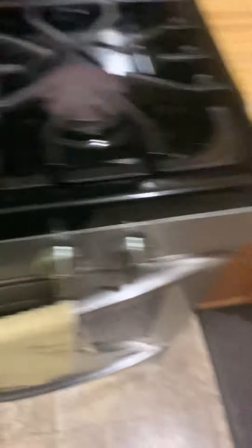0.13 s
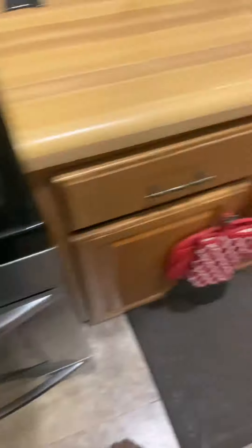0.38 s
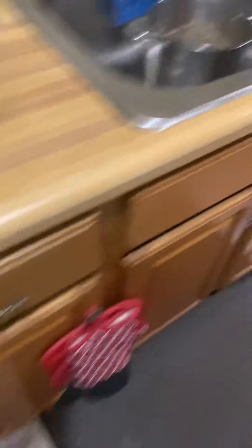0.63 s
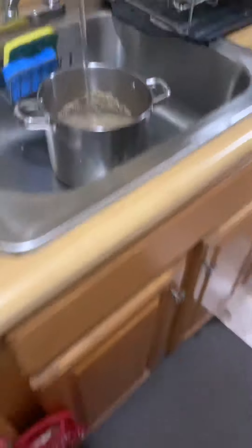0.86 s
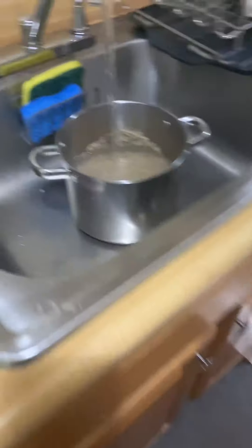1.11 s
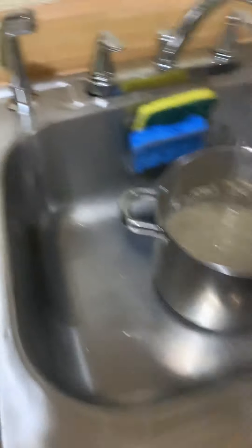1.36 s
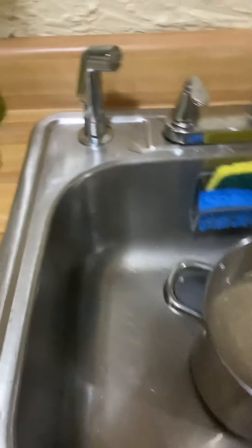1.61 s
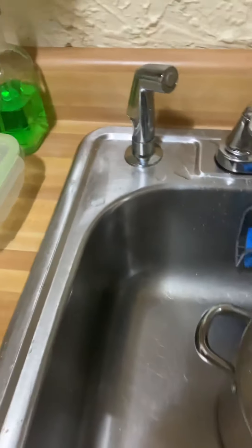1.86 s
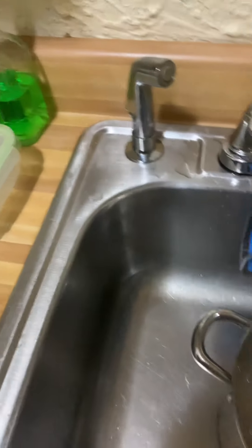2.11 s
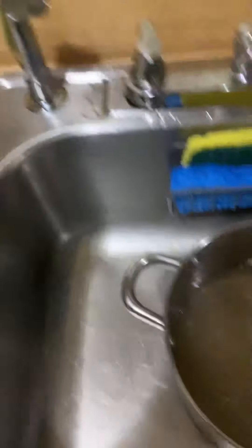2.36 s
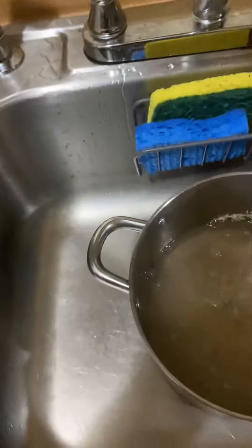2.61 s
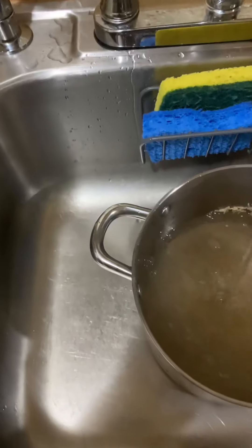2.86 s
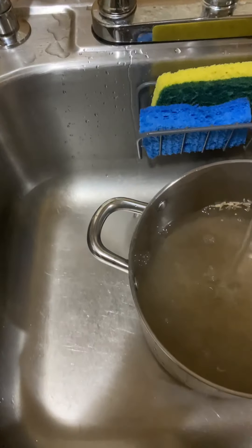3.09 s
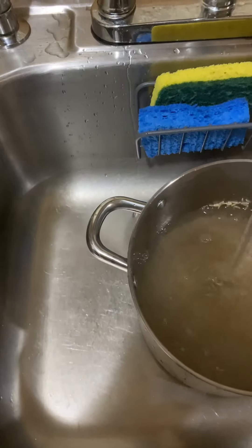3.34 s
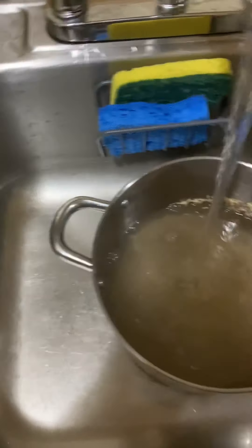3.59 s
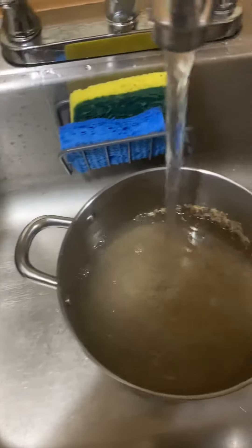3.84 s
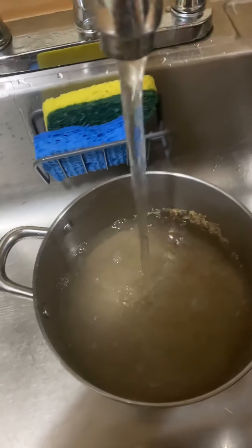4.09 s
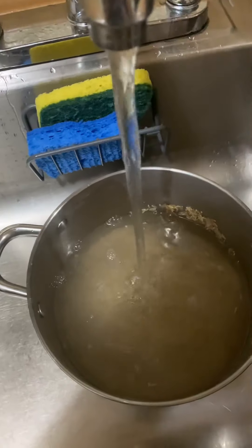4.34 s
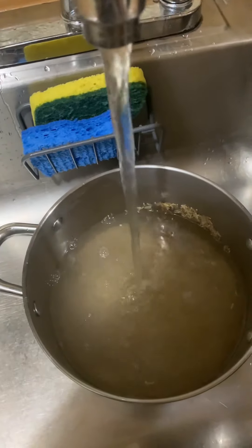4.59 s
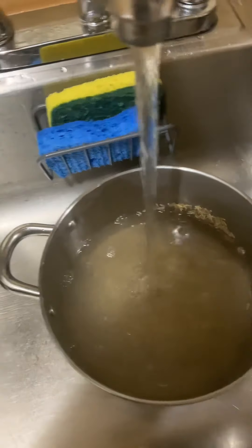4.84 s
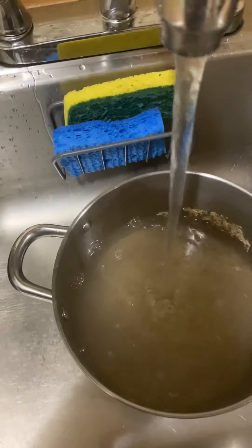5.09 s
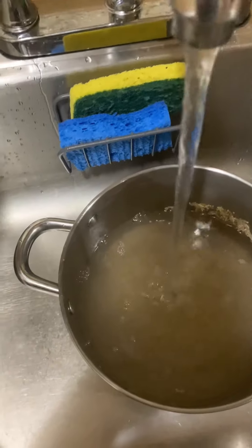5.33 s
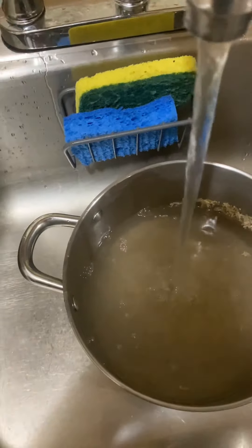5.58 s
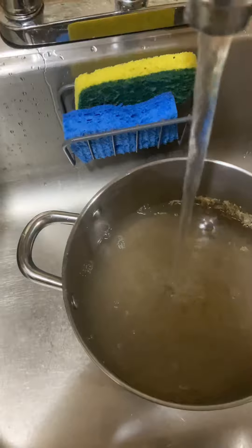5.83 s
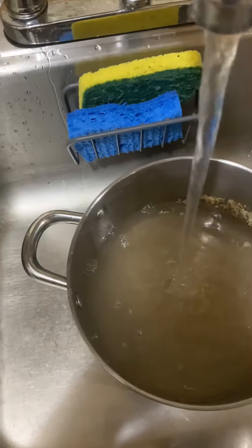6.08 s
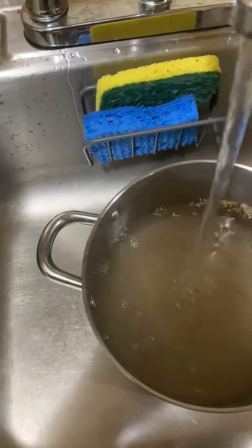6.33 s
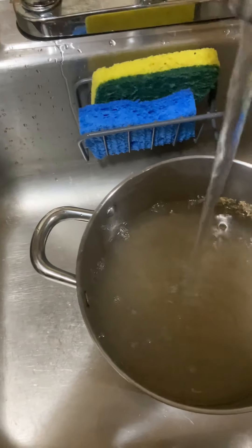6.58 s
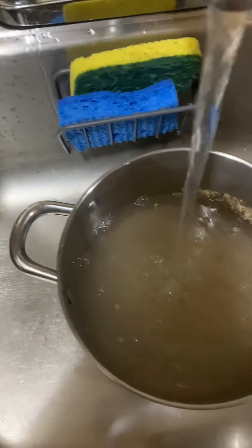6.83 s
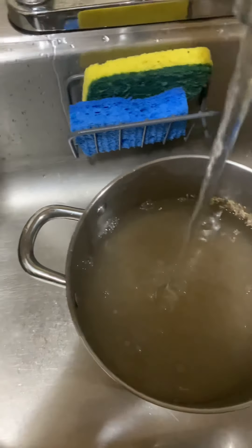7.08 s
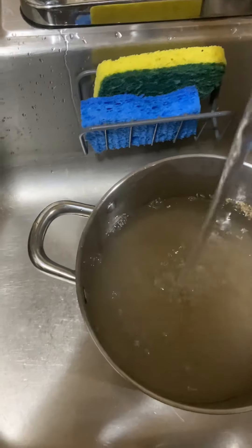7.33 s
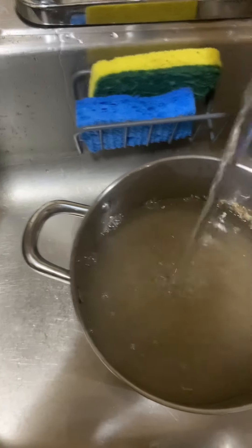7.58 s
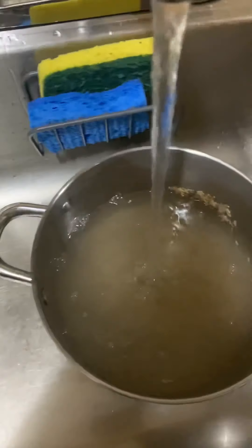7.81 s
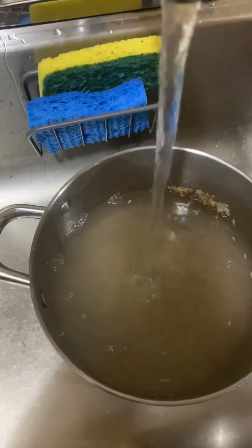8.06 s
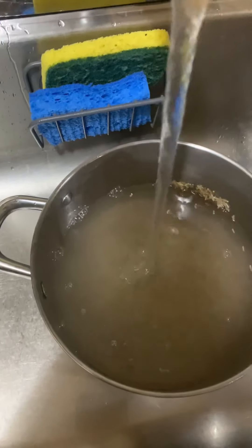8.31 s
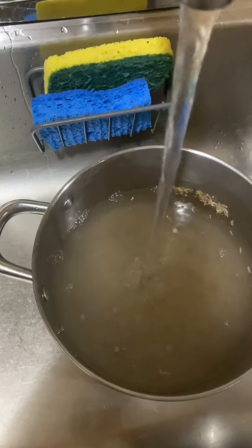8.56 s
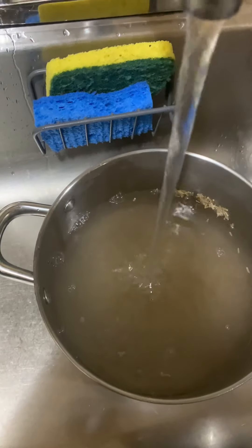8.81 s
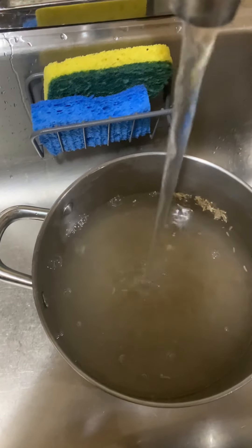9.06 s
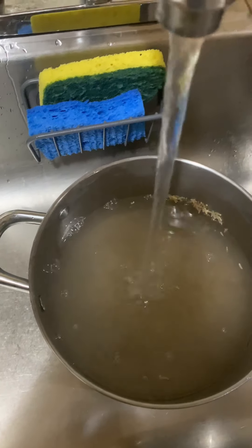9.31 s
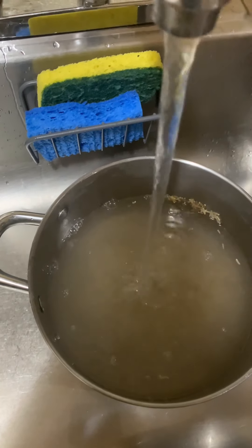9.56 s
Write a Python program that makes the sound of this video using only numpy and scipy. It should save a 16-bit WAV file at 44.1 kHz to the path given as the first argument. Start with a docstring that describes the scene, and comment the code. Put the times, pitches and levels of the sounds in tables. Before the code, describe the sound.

A handheld stereo microphone crosses a small indoor kitchen toward a running tap. At 0 s the water is a faint, distant hiss over a quiet low appliance drone. Around 0.4-0.55 s a floorboard gives a short, rough creak; a dull low footstep follows at 0.6 s with a weaker thud just after, and another soft step at 1.3 s. A drop ticks on steel near 0.9 and 1.4 s. The hiss swells steadily until about 4 s, bright and slightly metallic from the pot and sink. Hollow gulps thicken from 2.3 s, with a strong one near 4 s and others around 5.2-6 s. From 4 to 9.7 s the stream stays close and steady, full of small rising bubble pops, wavering gurgles and a brief bubbly flurry near 6.3 s. Sharp drop ticks come at 3.7, 4.5, 6.8 and 7.4 s, then cluster around 8.4-8.7 s. The water is still running at the end.

```python
"""Water hisses faintly into a steel pot in a steel sink, growing louder as a handheld phone nears it.
Early on a floorboard creaks by stick and slip, and footsteps thud as short, low sums of partials.
The jet is noise filtered by the rings of the steel; bubbles are short sines of rising pitch.
Large bubbles and churning noise sound the air in the pot, small bubbles pop, drops tick on the steel.
Beneath lies the kitchen's low drone, made of filtered noise and wavering tones."""
import sys
import numpy as np
from scipy import signal
from scipy.fft import rfft, irfft
from scipy.io import wavfile
from scipy.ndimage import uniform_filter1d

SR = 44100
rng = np.random.default_rng(int(sys.argv[2]) if len(sys.argv) > 2 else 0)


def int16_out(signal):
    """Quantize to a 16-bit WAV file."""
    q = np.round(np.clip(np.atleast_2d(signal).T, -1, 1) * 32767)
    wavfile.write(sys.argv[1], SR, q.astype(np.int16))


def voltage_ratio(level):
    """Linear amplitude factor for a level in decibels (scalar or array-like)."""
    return 10 ** (np.asarray(level, float) / 20)


N = 426888  # length in samples

# The water as the phone comes near. Each row: time in seconds, jet level in dB,
# level of the gurgle in the pot's hollow in dB.
WATER_LEVELS = [(0.0, -40.5, -49.5), (0.35, -39, -58), (0.7, -35.5, -52.5), (1.2, -33, -52),
                (2.0, -30, -47.5), (2.27, -30.5, -50), (2.34, -31, -43), (2.75, -29, -49), (3.2, -31, -42),
                (3.33, -30, -48.5), (3.9, -28, -47), (4.4, -27, -43), (4.95, -28, -46.5),
                (5.45, -27.5, -45), (5.65, -27.5, -48), (6.9, -28.5, -44), (7.27, -29.5, -48.5),
                (7.9, -28, -48.5), (8.6, -27.5, -45.5), (9.2, -29, -46.5), (9.68, -28.5, -49)]
# Broad colour of the jet between the rings. Each row: frequency in Hz, relative level in dB.
JET_COLOUR = [(300, -30), (1000, -26), (2000, -27), (2850, -27), (3190, -31), (3360, -23), (4100, -13),
              (4480, -21), (4900, -9), (5400, -16), (6500, -16), (7800, -12), (8500, -9), (9400, -9),
              (10300, -17), (11000, -17), (13000, -19), (15500, -18)]
# Rings of pot and sink. Each row: frequency in Hz, width in Hz, relative level in dB.
STEEL_MODES = [(2280, 60, -15.0), (3025, 48, -15.0), (3765, 63, -7.0), (3947, 96, -9.0), (4280, 70, -5.0),
               (4622, 41, -4.0), (4793, 89, -4.0), (4986, 44, -4.0), (5199, 76, -5.0), (5606, 61, -12.0),
               (6046, 42, -11.0), (7241, 70, -9.0), (7563, 45, -3.5), (8128, 65, -3.5), (8618, 37, -4.0),
               (8730, 45, -3.0), (9025, 68, -3.0), (9212, 57, 2.0), (9321, 38, 0.0), (9439, 35, -3.0),
               (9550, 60, 0.0), (9805, 60, -1.0), (10140, 100, -5.5), (10448, 63, -10.0), (10680, 70, -8.5),
               (11323, 110, -14.0), (11638, 36, -15.0), (11919, 44, -14.0), (12296, 39, -13.0),
               (12769, 55, -14.0)]
# Resonances of the air in the pot. Each row: frequency in Hz, width in Hz, relative level in dB.
AIR_MODES = [(594, 21, 1), (668, 40, -2.5), (790, 90, -17), (1250, 70, -6), (1530, 40, -11)]
# Loudest large bubbles pulled under by the jet. Each row: start in seconds, peak in dB, pitch in Hz.
LARGE_BUBBLES = [(1.365, -34.5, 640), (2.32, -42, 590), (2.46, -36, 590), (2.6, -36.5, 600),
                 (3.075, -36, 620), (3.13, -33.5, 580), (2.832, -31, 556), (2.887, -31, 660),
                 (3.692, -29, 625), (3.762, -34, 590), (3.924, -33, 575), (3.984, -22, 655),
                 (4.217, -31, 570), (4.261, -31.5, 595), (5.041, -28.5, 587), (5.193, -24.5, 570),
                 (5.32, -37, 596), (5.36, -32, 600), (5.491, -26, 563), (5.631, -34.5, 665),
                 (5.962, -32, 630), (6.043, -26, 587), (6.689, -27, 630), (6.849, -37, 584),
                 (6.906, -30, 680), (7.731, -27.5, 620), (8.251, -34, 603), (8.573, -33, 670)]
# Loudest small bubbles. Each row: start in seconds, peak in dB before the steel answers, pitch in Hz.
SMALL_BUBBLES = [(1.6881, -29, 3930), (2.0964, -34.5, 2200), (2.1281, -23, 3930), (2.3243, -37.5, 2230),
                 (2.8696, -28, 2940), (2.9634, -40, 1380), (3.0611, -41, 2330), (3.5845, -43, 1820),
                 (3.9187, -33, 2330), (3.9811, -31, 1790), (4.4749, -37, 2270), (4.6361, -34, 2220),
                 (4.9598, -40, 1550), (5.1454, -37, 1410), (5.2337, -36.5, 1400), (5.6473, -36.5, 1420),
                 (5.9865, -35, 1400), (7.5684, -35, 1610), (7.6921, -35, 2480), (7.7221, -29.5, 2420),
                 (7.76, -35, 1340), (8.1101, -36, 3020), (2.1796, -38, 2230), (2.61, -37, 2270),
                 (2.7, -32, 2960), (2.935, -31, 3000), (4.99, -34, 2300), (5.4, -40, 1450),
                 (8.19, -32, 2800), (8.295, -41, 2320), (8.49, -35, 2400), (8.555, -33, 2510),
                 (8.69, -32, 2500), (8.75, -35.5, 1350), (9.095, -36, 2600), (8.5526, -37, 1350),
                 (8.5835, -48, 1520), (8.6654, -38, 1520), (8.7242, -28.5, 3040), (8.85, -50, 1160),
                 (8.9238, -42, 1530), (9.006, -33.5, 2400), (9.072, -37, 1560), (9.193, -41, 1160),
                 (9.2376, -38, 1330), (9.284, -34, 2270), (9.5673, -43, 1600), (3.9554, -36, 1350),
                 (4.13, -33, 2280), (4.2238, -23, 3780), (4.3975, -27, 3020), (4.809, -31.5, 1305),
                 (5.0315, -18, 3840), (5.1047, -24, 3870), (5.393, -24, 3800), (5.531, -23, 3770),
                 (5.692, -28, 2280), (6.031, -36.5, 1120), (6.241, -29, 3000), (7.7218, -30, 3700),
                 (7.8371, -30, 2630), (7.9564, -26, 3960), (8.148, -33.5, 2270), (8.1838, -36.5, 1350),
                 (8.3858, -29.5, 2400), (8.518, -39, 1300), (8.629, -25, 3730), (8.691, -22, 3920),
                 (9.2606, -29.5, 2550), (9.478, -23.5, 3010)]
# Drops on bare steel. Each row: start in seconds, peak in dB, pitch in Hz.
DROP_TICKS = [(0.9009, -19.5, 5200), (1.4242, -21.5, 5900), (3.6895, -14.5, 6750), (4.4544, -21, 7000),
              (6.78, -21, 6500), (7.3706, -17.5, 7100), (8.429, -20, 6460), (8.656, -22, 6890),
              (8.6967, -17, 7240), (8.737, -17, 7400)]
# Quick swarms of bubbles. Each row: start in seconds, length in seconds, level in dB, middle pitch in Hz.
BUBBLE_SWARMS = [(1.633, 0.11, -42, 2070), (6.252, 0.32, -46.5, 1710)]
# Slipping of the floorboard. Each row: time in seconds, relative level in dB, mean slips per second.
BOARD_SLIPS = [(.379, -32.5, 67), (.44, -32, 64), (0.499, -35, 77), (0.549, -33, 98)]
# Resonances of the floorboard. Each row: frequency in Hz, width in Hz, relative level in dB.
BOARD_MODES = [(110, 70, -2), (240, 90, -6), (416, 17, 7), (650, 250, -15), (950, 250, -22),
               (1250, 90, -13), (1510, 60, -20)]
# Footsteps. Each row: start in seconds, starting level in dB, lowest partial in Hz,
# length in seconds, change of level by the end in dB.
FOOTSTEPS = [(0.626, -28.5, 46, 0.11, -7), (0.734, -39, 50.3, 0.043, -3), (1.321, -34, 46.3, 0.085, -7)]
# Spectrum of the low air noise. Each row: frequency in Hz, relative density in dB per Hz.
DRONE_COLOUR = [(28, -33), (50, -9), (65, -3.5), (102, -4), (150, -0.5), (179, -8.5), (237, 0), (300, 0),
                (445, -10.5), (520, -11), (680, -24), (1140, -120)]
# Appliance tones. Each row: mean frequency in Hz, mean amplitude in dB.
APPLIANCE_TONES = [(43.1, -51), (118.4, -70), (236.9, -57)]
# Relation of the left and right channels; phase_steps() reshapes lead and likeness in the treble.
# Each row: frequency in Hz, lead of the left in half turns, likeness from 0 to 1, left minus right in dB.
CHANNEL_PAIR = [(30, 0, 1, 0), (200, -.05, .97, -1.8), (340, -.1, .9, -1.2), (620, -.36, .62, -6.5),
                (1000, -.1, .6, -5), (1400, 0, .85, 0), (2000, .06, .8, 0), (2500, .3, .5, -1),
                (3400, .5, .5, 0), (3800, .6, .9, 0), (4690, 1, .99, 0), (6650, 2, .99, 0),
                (16380, 6.5, .99, 0)]


def evened(x):
    """Normalization: scales a signal to rms 1."""
    return x / np.sqrt(np.mean(x ** 2) + 1e-20)


def add(mix, start_s, sound):
    """Superposition: adds a sound to the mix at start_s seconds."""
    part = mix[round(start_s * SR):][:len(sound)]
    part += sound[:len(part)]


def slow(count, frames, size):
    """Low-passed chance: rows of noise averaged twice over size frames, rms 1."""
    noise = rng.standard_normal((frames, count))
    once = uniform_filter1d(noise, size, 0)
    return evened(uniform_filter1d(once, size, 0)).T


def control(column):
    """Linear interpolation: one column of the water table, sample by sample."""
    return np.interp(np.arange(N) / SR, *np.transpose(WATER_LEVELS)[[0, column]])


def ring(x, modes):
    """Modal resonance: a sum of damped two-pole modes of alternating sign, driven by x."""
    out = 0
    for k, (hz, width, db) in enumerate(modes):
        r = np.exp(-np.pi * width / SR)
        pole = [1, -2 * r * np.cos(2 * np.pi * hz / SR), r * r]
        mode = signal.lfilter([1 - r, 0, r - 1], pole, x)
        out = out + (-1) ** k * voltage_ratio(db) * mode
    return out


def blip(hz, cycles, glide):
    """Bubble oscillation: a swelling and dying sine whose pitch rises as it nears the surface."""
    u = np.arange(round(3 * cycles * SR / hz)) * hz / SR / cycles
    shape = u ** 0.7 * np.exp(-2.2 * u)
    turns = cycles * (u + glide * u ** 2 / 2)
    return np.sin(2 * np.pi * turns) * shape / shape.max()


def sparse(per_s, spread_db):
    """Random impulses of either sign at chance moments: mostly small, a few large."""
    size = voltage_ratio(spread_db * np.minimum(rng.exponential(1, N), 3))
    return size * (rng.random(N) < per_s / SR) * rng.choice([-1., 1.], N)


def crowd(lo_hz, hi_hz, per_s, cycles, count):
    """Shot noise: bubbles of count pitches at random moments, some pitches gliding far; rms 1."""
    total = 0
    for hz in np.geomspace(lo_hz, hi_hz, count):
        moments = sparse(per_s / count, spread_db=2.0)
        bubble = blip(hz, cycles, 0.308 * rng.random() ** 2)
        total = total + signal.oaconvolve(moments, bubble)[:N]
    return evened(total)


def splash_db(t):
    """Distance balance: lift of splash over hiss at times t, greater from afar, with a drawn wander."""
    close_db, lift_close_db, lift_per_db, wander_db = -29, 0.37, 0.35, 1.23
    far_db = close_db - np.interp(t, *np.transpose(WATER_LEVELS)[[0, 1]])
    waves = (np.sin(2 * np.pi * (f * t + rng.random())) for f in np.geomspace(.3, 1.5, 8))
    return lift_close_db + lift_per_db * far_db + wander_db * evened(sum(waves))


def with_echo(x, t60=.06, count=5):
    """Reverberation: the direct sound and a smeared copy, from random tails crossfaded in turn."""
    t = np.arange(4096) / SR
    tails = rng.standard_normal((count, 4096)) * voltage_ratio(-60 * t / t60)
    tails = tails / np.linalg.norm(tails, axis=1, keepdims=True)
    place = (np.arange(N) / SR * 3 - np.arange(count)[:, None]) % count - 1  # three tails a second
    turns = np.cos(np.pi / 2 * np.clip(place, -1, 1))  # neighbours overlap, squares sum to 1
    copies = signal.oaconvolve(x * turns, tails, axes=1)
    return np.array([x, copies.sum(0)[:N]])


def jet():
    """Filtered turbulence: hiss coloured by steel rings that swell and fade as the phone shifts."""
    drive = rng.standard_normal((2, N)) * voltage_ratio(0.34 * slow(count=1, frames=N, size=500))
    hz, t, z = signal.stft(drive, SR, nperseg=1024, noverlap=768)
    colour_hz, colour_db = np.transpose(JET_COLOUR)
    power = voltage_ratio(2 * np.interp(np.log(hz + 1), np.log(colour_hz), colour_db))[:, None]
    # echoes off the sink walls ripple the colour, and the ripple shifts as the phone moves
    ripple = evened(uniform_filter1d(slow(count=513, frames=len(t), size=150), 3, 0))
    power = power * voltage_ratio(2 * 3.2 * ripple)
    drift_db = 2.7 * slow(count=len(STEEL_MODES), frames=len(t), size=60)
    for (ring_hz, width, db), drift in zip(STEEL_MODES, drift_db):
        detuning = 2 * (hz[:, None] - ring_hz) / width
        power = power + voltage_ratio(2 * (db + drift)) / (1 + detuning ** 2) ** 1.5
    patches = evened(uniform_filter1d(slow(count=513, frames=len(t), size=4), 14, 0))
    low = 1 / (1 + (hz[:, None] / 5600) ** 8)  # the splash rules the lower hump
    z *= np.sqrt(power) * voltage_ratio(1.1 * patches + low * splash_db(t))
    hiss = signal.istft(z, SR, nperseg=1024, noverlap=768)[1][:, :N]
    return voltage_ratio(control(column=1)) * evened(hiss)


def hollow():
    """Cavity resonance: large bubbles and the churn of the jet sound the air in the pot."""
    churn = rng.standard_normal(N) * voltage_ratio(4.6 * slow(count=1, frames=N, size=2000)[0])
    large = crowd(562, 830, 110, 5.94, count=8)
    gurgle = evened(ring(churn, AIR_MODES)) + 0.67 * large + 0.84 * evened(ring(large, AIR_MODES))
    out = voltage_ratio(control(column=2)) * evened(gurgle)
    for s, db, hz in LARGE_BUBBLES:
        gulp = np.append(blip(hz, 2.04, 0.035), np.zeros(6000))
        add(gulp, 0, 0.88 * blip(hz / 2, 0.49, 0.05))  # the slap of the water closing over
        gulp = gulp + 17 * ring(gulp, AIR_MODES[:1]) + 5 * ring(gulp, AIR_MODES[1:3])
        add(out, s, voltage_ratio(db) * gulp / abs(gulp).max())
    return with_echo(out, .05)


def bubbles():
    """Bubble acoustics: single pops, swarms and ticks over a crowd, with the steel ringing in answer."""
    level_db = control(column=1) + splash_db(np.arange(N) / SR) - 22.5
    pops = crowd(1107, 3097, 350, 8.8, count=24)
    plops = crowd(1020, 3150, 150, 1.74, count=8)  # briefer than the pops
    out = voltage_ratio(level_db) * (pops + 0.35 * plops)
    out *= voltage_ratio(2.26 * slow(count=1, frames=N, size=1100)[0])  # bubbles come in clumps
    for s, length, db, hz in BUBBLE_SWARMS:
        swarm = crowd(0.82 * hz, 1.37 * hz, 900, 7.6, count=6)[:round(length * SR)]
        add(out, s, voltage_ratio(db) * swarm * np.hanning(len(swarm)))
    for s, db, hz in SMALL_BUBBLES:
        add(out, s, voltage_ratio(db) * blip(hz, 9.9, 0.028))
    out = out + 0.67 * ring(out, STEEL_MODES[:2])  # the lowest rings of the pot answer the pops
    for s, db, hz in DROP_TICKS:
        tick = np.append(blip(hz, 3, .1), np.zeros(1500))
        tick = tick + 14 * ring(tick, STEEL_MODES)
        add(out, s, voltage_ratio(db) * tick / abs(tick).max())
    return with_echo(out, 0.17)


def creak():
    """Stick-slip friction: uneven jerks and rubbing under the weight excite the board's modes."""
    s, db, rate = np.transpose(BOARD_SLIPS)
    t = np.arange(s[0], s[-1], 1 / SR)
    since = t - s[0]
    level_db = np.interp(t, s, db)
    unevenness = 1 + 0.12 * slow(count=1, frames=len(t), size=300)[0]
    turns = np.cumsum(np.interp(t, s, rate) * unevenness) / SR
    slips = np.diff(np.floor(turns), prepend=-1) * voltage_ratio(level_db + 2 * rng.standard_normal(len(t)))
    rub = 0.029 * np.minimum(since / 0.053, 1) * voltage_ratio(level_db)  # the jerks blur into rubbing
    force = slips * np.exp(-since / 0.22) + rub * rng.standard_normal(len(t))
    return voltage_ratio(43.5) * ring(np.append(force, np.zeros(4096)), BOARD_MODES)


def thud(hz, length, db, fade_db):
    """Forced floor vibration: inharmonic partials last a few cycles of the lowest."""
    t = np.arange(0, length, 1 / SR)
    partials = [(1, 1), (2.1, 0.16), (3.1, .12), (4.3, 0.075)]  # (frequency ratio, share)
    shake = sum(share * np.sin(2 * np.pi * k * hz * t) for k, share in partials)
    return voltage_ratio(db + fade_db * t / length) * signal.windows.tukey(len(t), .15) * shake


def walker():
    """Impact and friction: a board creaks under the weight and steps shake the floor."""
    out = np.zeros(N)
    add(out, BOARD_SLIPS[0][0], creak())
    for s, db, hz, length, fade_db in FOOTSTEPS:
        add(out, s, thud(hz, length, db, fade_db))
    return with_echo(out, .03)


def kitchen():
    """Ambient noise: low-frequency air noise and a few wavering appliance tones."""
    hz = np.fft.rfftfreq(N, 1 / SR)
    colour_hz, colour_db = np.transpose(DRONE_COLOUR)
    colour = voltage_ratio(np.interp(np.log(hz + 1), np.log(colour_hz), colour_db))
    noise = irfft(rfft(rng.standard_normal((2, N))) * colour, N)
    # the sink rumbles a little more from close by
    near_db = control(column=1) - np.median(control(column=1))
    out = voltage_ratio(-45 + 0.27 * near_db) * evened(noise)
    out *= voltage_ratio(0.74 * slow(count=1, frames=N, size=1800))  # the rumble comes in lumps
    for tone_hz, db in APPLIANCE_TONES:
        waver = slow(count=2, frames=N, size=9000)
        turns = np.cumsum(tone_hz * (1 + 0.00392 * waver[0])) / SR
        out += voltage_ratio(db + 1.3 * waver[1]) * np.sin(2 * np.pi * turns)
    return out


def phase_steps(hz, lead, like):
    """Stepped phase: treble lead is held near whole half turns, with less likeness in between."""
    high = hz > 10000  # here the steps are wider
    whole = np.round(lead)
    off = lead - whole
    hold = np.where(high, .27, .11)  # reach of a step to either side, half turns
    creep = .04  # largest departure while held, half turns
    free = np.clip((abs(off) - hold) / (.5 - hold), 0, 1)
    held = whole + np.sign(off) * (creep * np.minimum(abs(off) / hold, 1) + (.5 - creep) * free)
    loose = like + free * (np.where(high, .6, .78) - like)
    return np.where(hz > 4250, [held, loose], [lead, like])


def scene():
    """Superposition of sources. Rows: what both channels share, and what only the left one has."""
    return jet() + hollow() + bubbles() + walker() + kitchen()


def band_limit(x):
    """A steep low-pass at the top of the band."""
    return signal.sosfilt(signal.butter(12, 16900, fs=SR, output="sos"), x)


def record(dry):
    """Spaced reception: two ports differ in phase and level with frequency and are only partly alike."""
    hz = np.fft.rfftfreq(N, 1 / SR)
    at, *columns = np.transpose(CHANNEL_PAIR)
    lead, like, tilt_db = (np.interp(hz, at, c) for c in columns)
    lead, like = phase_steps(hz, lead, like)
    shared, own = rfft(dry) * (hz < 15780)  # upper edge of the band, Hz
    left = like * shared + np.sqrt(1 - like ** 2) * own
    left = left * np.exp(1j * np.pi * lead) * voltage_ratio(tilt_db / 2)
    right = shared * voltage_ratio(-tilt_db / 2)
    return band_limit(irfft(np.array([left, right]), N))


dry = scene()
out = record(dry)
int16_out(out)
```